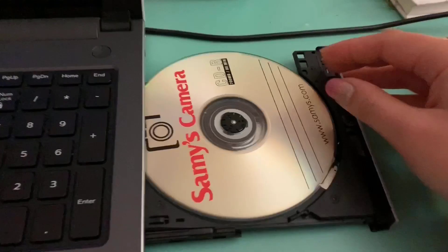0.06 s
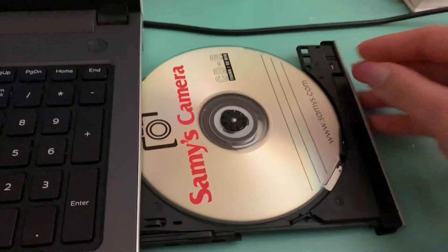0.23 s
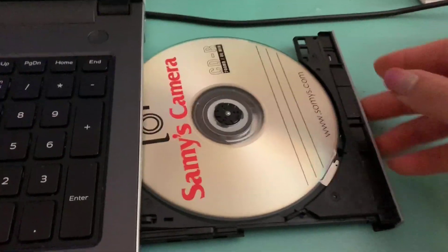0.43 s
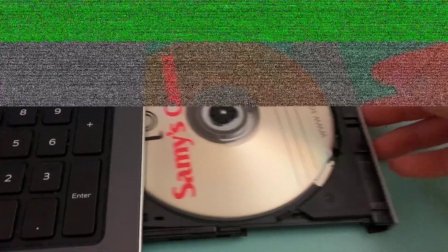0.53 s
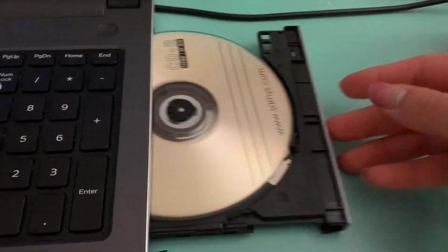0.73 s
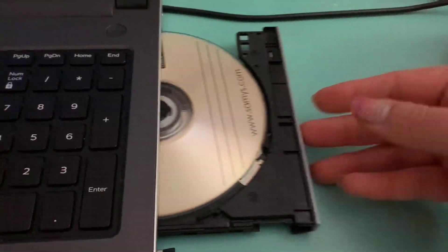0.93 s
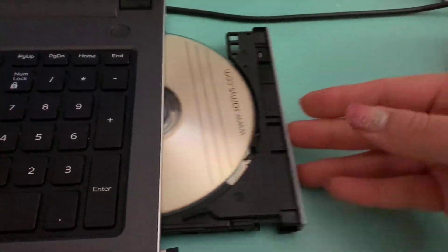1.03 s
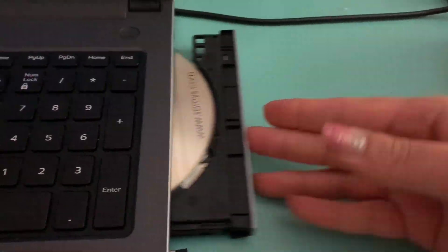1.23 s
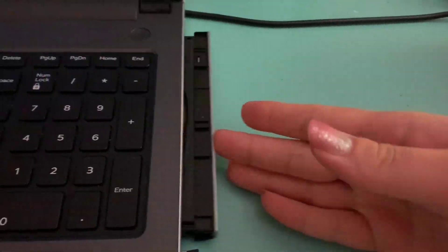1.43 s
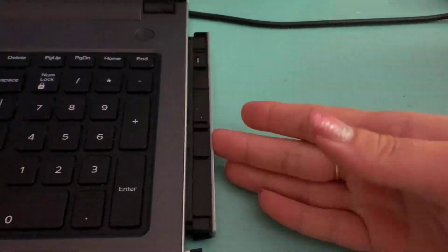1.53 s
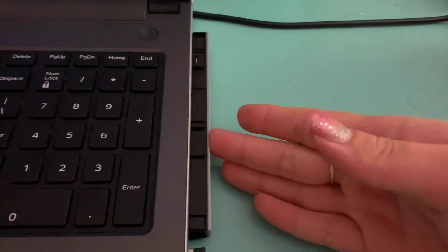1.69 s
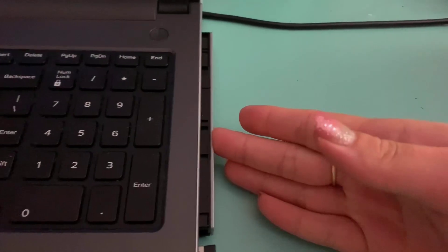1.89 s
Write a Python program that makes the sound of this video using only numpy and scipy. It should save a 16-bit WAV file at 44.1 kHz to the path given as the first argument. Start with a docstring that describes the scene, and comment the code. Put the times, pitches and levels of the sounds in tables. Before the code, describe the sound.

Plastic disc drive tray being pushed into a laptop, scraping along its rails and clicking closed, close up

```python
"""On a desk in a quiet room, a hand slides a thin plastic disc tray into a laptop near a two-port microphone.
Friction on the rails is shaped noise that partly excites the tray's decaying modes, with brief squeaks.
Catches snap as short noise bursts; the tray body and a rustle are noise through broad resonances.
Behind them lie a low rumble of room and desk, which swells slowly, and a faint steady hiss."""
import sys
import numpy as np
from scipy import signal
from scipy.fft import rfft, irfft
from scipy.io import wavfile
from scipy.ndimage import uniform_filter1d

SR = 44100
rng = np.random.default_rng(int(sys.argv[2]) if len(sys.argv) > 2 else 0)


def digitize_waveform(pressure):
    """Quantize a signal to 16-bit integers and store it at the path in sys.argv[1].

    Rows of a 2-D input are taken as channels; values are limited to [-1, 1].
    """
    field = np.atleast_2d(pressure).T
    bounded = np.clip(field, -1, 1)
    quanta = np.round(bounded * 32767).astype(np.int16)
    wavfile.write(sys.argv[1], SR, quanta)


N = 85995  # samples


def amp(db):
    """Level definition: amplitude ratio of a level in dB."""
    return 10 ** (np.asarray(db) / 20)


def evened(x):
    """Normalisation: scales a signal to unit RMS."""
    return x / np.sqrt(np.mean(x ** 2) + 1e-20)


def noise(*shape):
    """Gaussian white noise: equal mean power at all frequencies."""
    return rng.standard_normal(shape)


def read(points, hz):
    """Logarithmic pitch scale: interpolates (f/Hz, value) points along log frequency."""
    f, value = np.transpose(points)
    return np.interp(np.log(hz + 1), np.log(f + 1), value)


def curve(table, t, column=1):
    """Envelope: interpolates one table column linearly in time."""
    return np.interp(t, [row[0] for row in table], [row[column] for row in table])


def coloured(x, db_of_hz):
    """Linear filtering: multiplies the whole spectrum by a gain in dB."""
    hz = np.fft.rfftfreq(x.shape[-1], 1 / SR)
    return irfft(rfft(x) * amp(db_of_hz(hz)), x.shape[-1])


def smoothed_field(shape, bins, frames):
    """Correlated randomness: averages noise over STFT bins and frames."""
    across_pitch = uniform_filter1d(noise(*shape), size=bins, axis=0)
    return evened(uniform_filter1d(across_pitch, size=frames, axis=1))


# modes of the free tray: f/Hz, relative level/dB, t60/s
TRAY_MODES = [(950, -10.5, 0.013), (1416, -6, 0.039), (2050, -41, 0.0045), (2780, 18, 0.0028),
              (3050, 8, 0.034), (3720, -6, 0.024), (4800, 6.5, 0.026), (7300, -44, 0.0024),
              (8020, 3, 0.0079), (8100, -23, 0.0098), (10180, 8.5, 0.025), (11350, 8.5, 0.01),
              (12200, 4, 0.04), (15500, -6, 0.0083)]


def ring(held):
    """Modal superposition: damped sines answer one tap; held is the share of the free decay time."""
    t = np.arange(2000) / SR
    out = 0
    for hz, db, t60 in TRAY_MODES:
        out = out + amp(db - 60 * t / (t60 * held)) * np.sin(2 * np.pi * hz * t)
    return out / np.linalg.norm(out)


# scraping on the rails: t/s, level/dB, brightness/(dB per octave)
SCRAPE_COURSE = [(0, -68.5, -3.5), (.035, -78, 0.5), (.07, -86, 2.5), (.17, -75.5, 1.5), (.21, -69.5, 3.5),
                 (.28, -63.5, -3.5), (.30, -50.5, 0), (.342, -47, -1.5), (.385, -52.5, -0.5),
                 (.41, -61, -5), (.434, -55.5, -5), (.465, -70.5, -1.5), (.50, -56, -1.5), (.564, -47.5, 3),
                 (.65, -48, 2.5), (.675, -38.5, 4), (.70, -41.5, 3.5), (.744, -43.5, 3), (.77, -44.5, 2.5),
                 (.83, -44.5, 3), (.912, -47, -1), (.942, -46, -2.5), (.965, -51, 1.5), (1.036, -48, 0),
                 (1.064, -43, -0.5), (1.134, -39.5, 1), (1.226, -49.5, 0.5), (1.276, -42, -1),
                 (1.346, -48.5, 1), (1.385, -51, -1), (1.41, -59, -5), (1.45, -54.5, -3.5), (1.48, -54, -2),
                 (1.53, -73.5, -5.5), (1.59, -80, 2.5), (1.69, -65.5, -1), (1.80, -76, -1),
                 (1.82, -82.5, 1), (1.95, -81.5, 4)]
# spectrum of the rubbing: f/Hz, relative level per Hz/dB
SCRAPE_SPECTRUM = [(200, -8), (600, -6.5), (1000, -7.5), (2000, 0.5), (3500, -1.5), (5500, -7), (7500, -4),
                   (10000, -9), (13000, -11), (15500, -11)]
GRIT_PER_S, GRIT_SPREAD_DB = 5000, 3.5
GRIT_SHARE, RING_DB = 0.47, -12  # power share of grit in the drive; level of the modal ringing
PATCH_DB, STREAK_DB, FLICKER_DB = 1.5, 3, 0.89  # RMS level fluctuations
PIVOT_HZ, TILT_FROM_HZ = 4270, 1150  # zero of the brightness tilt; the tilt is flat below TILT_FROM_HZ


def scrape():
    """Friction excitation: random grit and smooth noise drive the tray's modes, in drifting patches."""
    grains = rng.random(N) < GRIT_PER_S / SR
    grain_db = GRIT_SPREAD_DB * np.minimum(rng.exponential(1, N), 3)
    grit = noise(2, N) * amp(grain_db) * grains
    drive = np.sqrt(GRIT_SHARE) * evened(grit) + np.sqrt(1 - GRIT_SHARE) * noise(2, N)
    rubbing = evened(coloured(drive, lambda f: read(SCRAPE_SPECTRUM, f)))
    ringing = signal.oaconvolve(drive, ring(1)[None])[:, :N]
    x = evened(rubbing + amp(RING_DB) * ringing)

    hz, t, z = signal.stft(x, SR, nperseg=512, noverlap=448)
    patches = smoothed_field(z.shape[1:], bins=10, frames=30)
    streaks = smoothed_field(z.shape[1:], bins=2, frames=40)  # thin brief whistles
    flicker = evened(uniform_filter1d(noise(len(t)), size=5))
    octaves = np.log2(np.maximum(hz[:, None], TILT_FROM_HZ) / PIVOT_HZ)
    gain_db = curve(SCRAPE_COURSE, t) + octaves * curve(SCRAPE_COURSE, t, column=2)
    gain_db = gain_db + PATCH_DB * patches + STREAK_DB * streaks + FLICKER_DB * flicker
    return signal.istft(z * amp(gain_db), SR, nperseg=512, noverlap=448)[1][:, :N]


# catches snapping: t/s, level/dB, rattle length/s, brightness/(dB per octave), peak f/Hz, low edge f/Hz
CATCHES = [(0.287, -29, 0.00089, 2.5, 6900, 2500), (0.2904, -40.5, 0.0022, -1.5, 3900, 2500),
           (0.426, -56.5, 0.0049, -8, 2400, 900), (0.938, -39, 0.0098, 4.5, 7630, 900),
           (1.1161, -22.5, 0.0027, 2, 7240, 890), (1.4583, -35.5, 0.0021, 0, 3170, 885),
           (1.461, -40, 0.0032, -0.5, 2520, 1600)]
HELD = .22  # share of the free ring time
RISE_S, FALL_T60_S, DESK_T60_S = 0.0004, 0.011, 0.11
SNAP_RING_DB, DESK_DB = -2.5, -21.5
SAG_DB = 4.5  # the rattle weakens by this over its length
PEAK_DB, PEAK_WIDTH_HZ = 10, 1100


def clicks():
    """Impact excitation: each snap is a short rattle ringing the held tray, with a faint tail off the desk."""
    out, t = np.zeros((2, N + SR)), np.arange(6000) / SR
    for start, level_db, length, bright_db, peak_hz, low_hz in CATCHES:
        def tone(f):
            tilt = bright_db * np.log2((f + 200) / PIVOT_HZ)
            low_cut = -20 * np.log10(1 + (low_hz / (f + 1)) ** 3)
            peak = PEAK_DB / (1 + (2 * (f - peak_hz) / PEAK_WIDTH_HZ) ** 2)
            return tilt + low_cut + peak

        progress = np.minimum(t / length, 1)
        fall_db = -SAG_DB * progress - 60 * np.maximum(t - length, 0) / FALL_T60_S
        direct = np.minimum(t / RISE_S, 1) * amp(fall_db)
        desk_tail = amp(DESK_DB - 60 * t / DESK_T60_S) * progress
        rattle = noise(2, len(t)) * amp(0.63 * noise(len(t)))  # dB spread between samples
        rattle = evened(coloured(rattle, tone)) * (direct + desk_tail)
        ringing = signal.fftconvolve(rattle, ring(HELD)[None])[:, :len(t)]
        first = round(start * SR)
        out[:, first:first + len(t)] += amp(level_db) * (rattle + amp(SNAP_RING_DB) * ringing)
    return out[:, :N]


# fuzzy tones in the scraping and after the snaps: t/s, length/s, f/Hz, width/Hz, level/dB
SQUEAK_TONES = [(0.19, 0.12, 5430, 900, -76.5), (.288, 0.0041, 6700, 700, -39),
                (0.31, 0.066, 1400, 200, -57), (.412, .05, 290, 60, -50), (.416, .045, 455, 70, -53),
                (.552, .06, 2880, 220, -54), (0.606, 0.069, 10100, 300, -56), (.665, .035, 3000, 250, -59),
                (.67, 0.038, 8600, 150, -65), (0.715, .05, 4680, 300, -57), (0.77, 0.044, 2660, 170, -61),
                (1.116, .007, 4700, 600, -39), (1.117, 0.0136, 680, 180, -48),
                (1.261, 0.067, 970, 150, -61), (1.46, 0.0106, 5100, 500, -55),
                (1.457, 0.0076, 6400, 500, -51), (1.46, 0.12, 2900, 900, -61.5),
                (1.467, .16, 4790, 450, -74.5), (1.648, .1, 2950, 300, -73), (1.64, 0.11, 1220, 250, -72.5)]
SQUEAK_RISE, SQUEAK_FADE_DB = .15, -16  # rise as share of the length; fade over the length


def squeaks():
    """Narrow-band noise: a fuzzy pitch that starts quickly and fades."""
    out = np.zeros((2, N))
    for start, length, hz, width, level_db in SQUEAK_TONES:
        u = np.arange(round(length * SR)) / (length * SR)  # share of the length elapsed
        tone = coloured(noise(2, len(u)), lambda f: -20 * np.log10(1 + (2 * (f - hz) / width) ** 2))
        shape = np.minimum(u / SQUEAK_RISE, 1) * amp(SQUEAK_FADE_DB * u) * (1 - u ** 4)
        first = round(start * SR)
        out[:, first:first + len(u)] += [amp(level_db) * evened(port * shape) for port in tone]
    return out


LUMPS_DB = 1.2  # RMS level fluctuation


def hollow(level, resonances):
    """Resonant filtering: noise of lumpy level passes a few parallel bands whose powers add."""
    def bands(f):
        power = 0
        for hz, width, db in resonances:
            power = power + amp(2 * db) / (1 + (2 * (f - hz) / width) ** 2) ** 2
        return 10 * np.log10(power)

    lumps = evened(uniform_filter1d(uniform_filter1d(noise(N), size=500), size=500))
    x = evened(coloured(noise(2, N), bands))
    return x * amp(curve(level, np.arange(N) / SR) + LUMPS_DB * lumps)


# hollow rubbing of the tray body: t/s, level/dB
BODY_COURSE = [(0.0, -74), (0.032, -68), (0.07, -92), (0.206, -50), (0.228, -63), (0.254, -52),
               (0.39, -49.5), (0.434, -51), (0.456, -54.5), (0.532, -52.5), (0.586, -66.5), (0.8, -65.5),
               (0.928, -58.5), (1.032, -72), (1.07, -55), (1.238, -61), (1.314, -51), (1.346, -60),
               (1.606, -68), (1.802, -64.5), (1.84, -83), (1.916, -81.5), (1.95, -93)]
# its resonances: f/Hz, width/Hz, relative level/dB
BODY_RESONANCES = [(238, 41, 2), (280, 82, 2.5), (343, 66, 4), (456.6, 115, -1.5)]


def body():
    """Body resonance: rubbing noise is coloured by the low resonances of the tray body."""
    return hollow(BODY_COURSE, BODY_RESONANCES)


# low-mid rustle: t/s, level/dB
RUSTLE_COURSE = [(0.0, -68), (0.076, -83), (0.238, -61), (0.368, -58), (0.456, -67.5), (0.678, -62),
                 (0.846, -60.5), (1.134, -65.5), (1.248, -55), (1.33, -57), (1.454, -74.5), (1.71, -67),
                 (1.95, -72.5)]
# its bands: f/Hz, width/Hz, relative level/dB
RUSTLE_RESONANCES = [(498, 130, -8.5), (911, 128, 4.5), (1170, 1500, -2.5), (1397, 33, 1),
                     (2600, 2300, -13.5)]


def rustle():
    """Band-limited noise: narrow and broad bands combine into a rustle."""
    return hollow(RUSTLE_COURSE, RUSTLE_RESONANCES)


# low rumble of room and desk: t/s, level/dB
RUMBLE_COURSE = [(0.0, -53.5), (0.032, -52.5), (0.07, -68), (0.216, -51.5), (0.488, -58), (0.526, -52),
                 (0.694, -54), (0.884, -52), (1.688, -52), (1.824, -57.5), (1.89, -53.5), (1.95, -55.5)]
# its spectrum: f/Hz, relative level per Hz/dB
RUMBLE_SPECTRUM = [(20, -29), (40, -9), (55, -0.5), (78, 4), (105, -3), (165, -8.5), (210, -13.5),
                   (330, -27), (500, -40), (1800, -54.5)]
# spectrum of the hiss: f/Hz, relative level per Hz/dB
HISS_SPECTRUM = [(500, 4), (2000, 8), (4000, -11), (8000, -1), (15000, -3)]
HISS_DB = -87.5


def room():
    """Stationary noise floor: steady hiss, under a low rumble with a slowly varying envelope."""
    rumble = evened(coloured(noise(2, N), lambda f: read(RUMBLE_SPECTRUM, f)))
    hiss = evened(coloured(noise(2, N), lambda f: read(HISS_SPECTRUM, f)))
    return rumble * amp(curve(RUMBLE_COURSE, np.arange(N) / SR)) + amp(HISS_DB) * hiss


def scene():
    """Superposition: the pressures of all sources add."""
    return scrape() + clicks() + squeaks() + body() + rustle() + room()


# likeness of the two ports: f/Hz, coherence/(0-1)
PORT_LIKENESS = [(60, .9), (300, .95), (600, .6), (1200, .55), (1900, .62), (2700, .68), (4000, .5),
                 (5300, .45), (6200, .7), (7200, .9), (8000, .999), (16000, .999)]
# phase by which the left port leads: f/Hz, phase/rad
PORT_LEAD = [(60, 0), (1250, .2), (1600, 2.3), (1900, 2.8), (3150, 3.1), (3500, 4.5), (4500, 6.1),
             (6300, 6.6), (7300, 4.25)]
# left minus right: f/Hz, level difference/dB
PORT_TILT = [(60, 1), (200, 1), (380, 1.5), (750, 7), (1290, 3), (2400, 0), (4400, -1.5), (6400, -1),
             (9000, .2), (15000, .3)]
TREBLE_LAG = 8 / SR  # s, the left port lags above the last PORT_LEAD point
EDGE_HZ = 16650
SOFT_EDGE_HZ, SOFT_EDGE_WIDTH_HZ, SOFT_EDGE_DB = 15680, 120, -34


def record(dry):
    """Interport coherence: ports partly alike, shifted in phase, nearly one delayed signal in the treble."""
    hz, (a, b) = np.fft.rfftfreq(N, 1 / SR), rfft(dry)
    same = read(PORT_LIKENESS, hz)
    treble_lead = 2 * np.pi * (2 - hz * TREBLE_LAG)  # two whole turns keep the phase continuous
    lead = np.where(hz < PORT_LEAD[-1][0], read(PORT_LEAD, hz), treble_lead)
    right = (same * a + np.sqrt(1 - same ** 2) * b) * np.exp(-1j * lead)
    half_tilt = amp(read(PORT_TILT, hz) / 2)
    pair = np.array([a * half_tilt, right / half_tilt])
    soft_edge = amp(SOFT_EDGE_DB * np.clip((hz - SOFT_EDGE_HZ) / SOFT_EDGE_WIDTH_HZ, 0, 1))
    pair = irfft(pair * soft_edge, N)
    band_limit = signal.firwin(511, EDGE_HZ, window=("kaiser", 9), fs=SR)
    return signal.oaconvolve(pair, band_limit[None], "same")


dry = scene()
out = record(dry)
digitize_waveform(out)
```